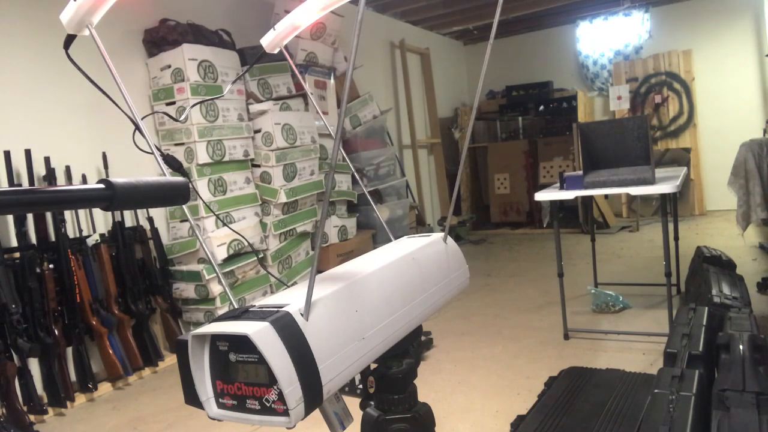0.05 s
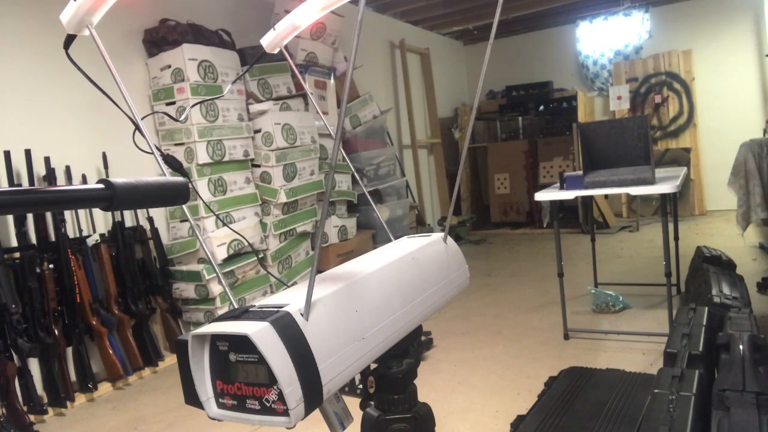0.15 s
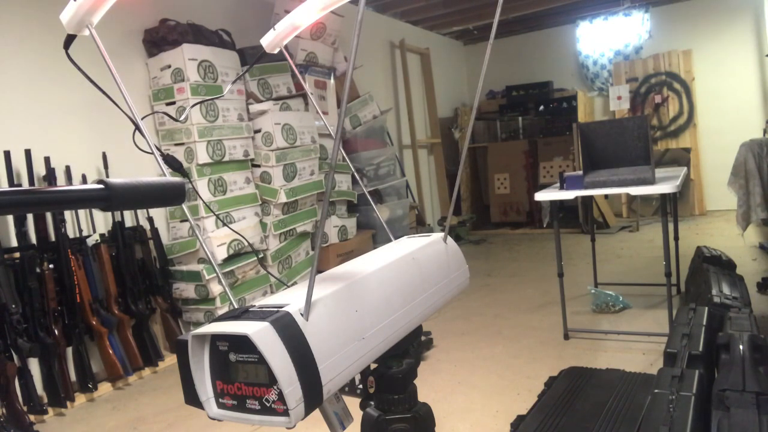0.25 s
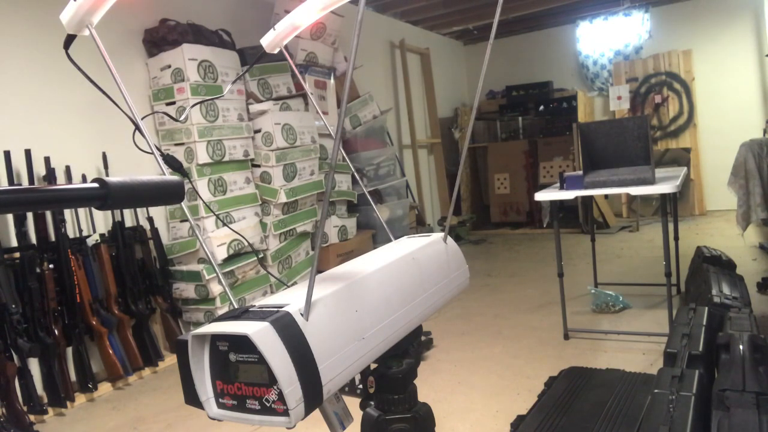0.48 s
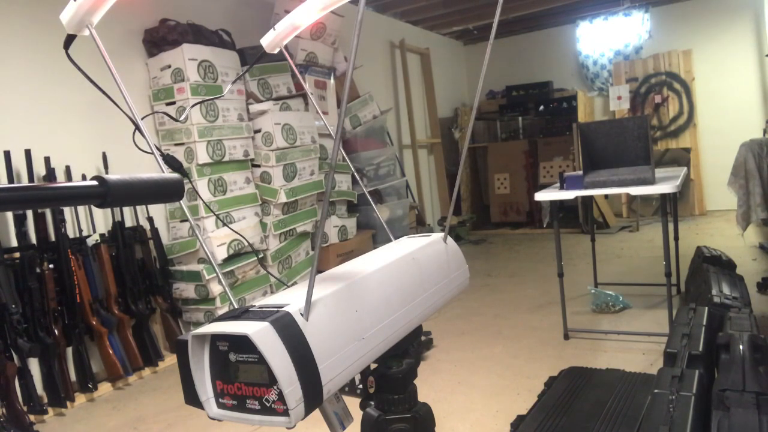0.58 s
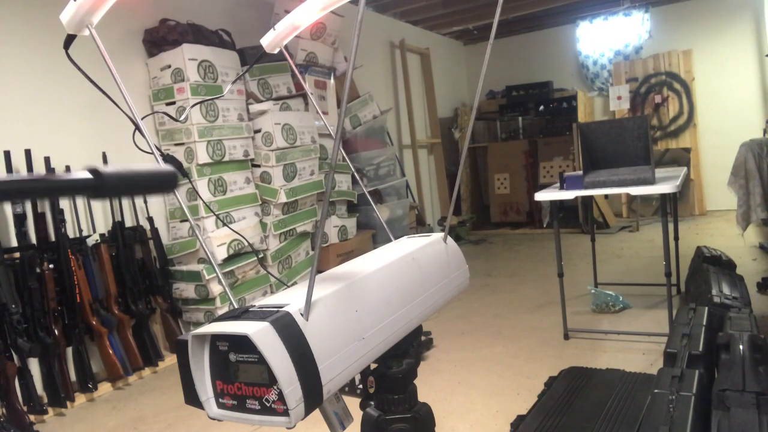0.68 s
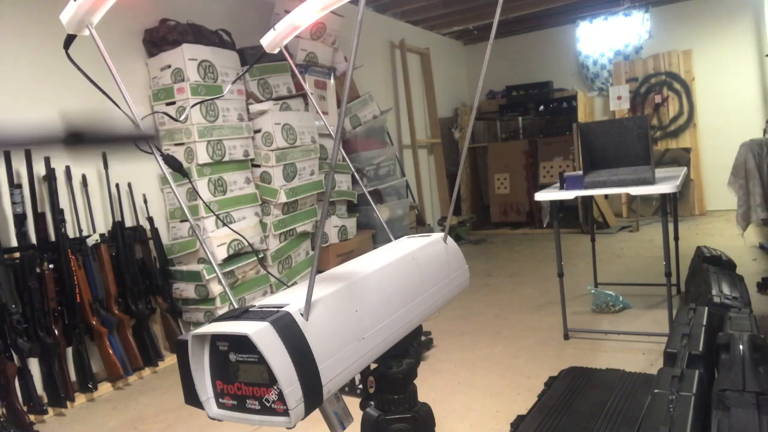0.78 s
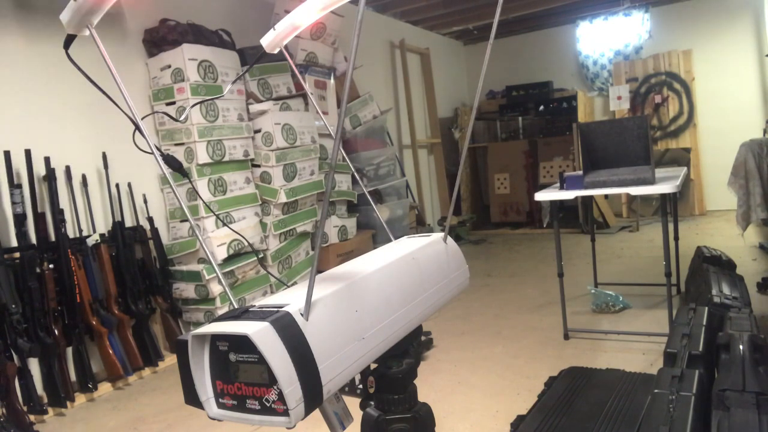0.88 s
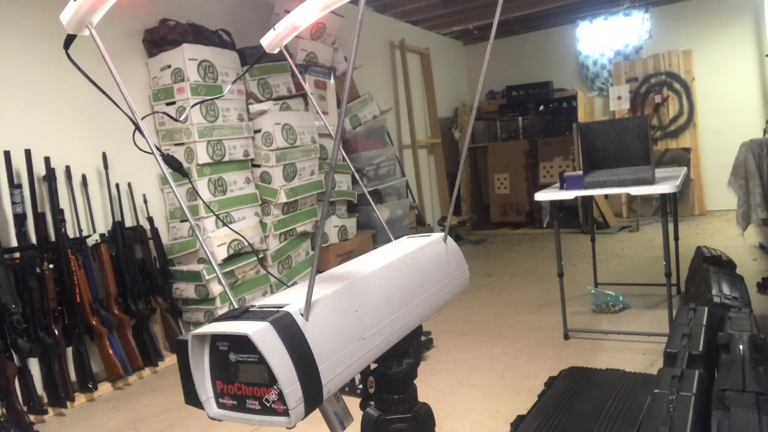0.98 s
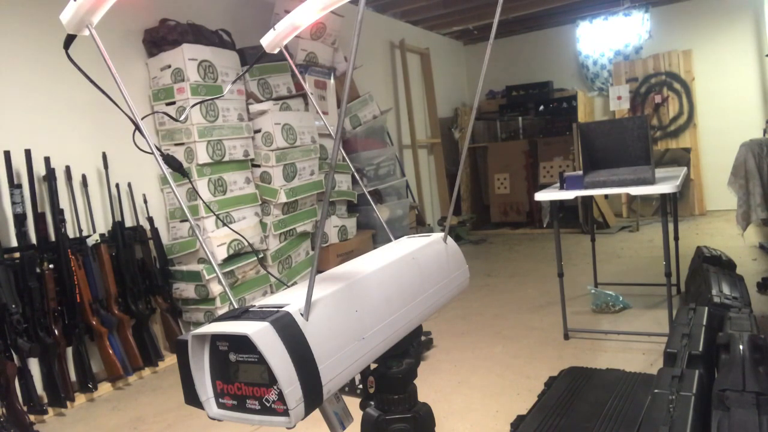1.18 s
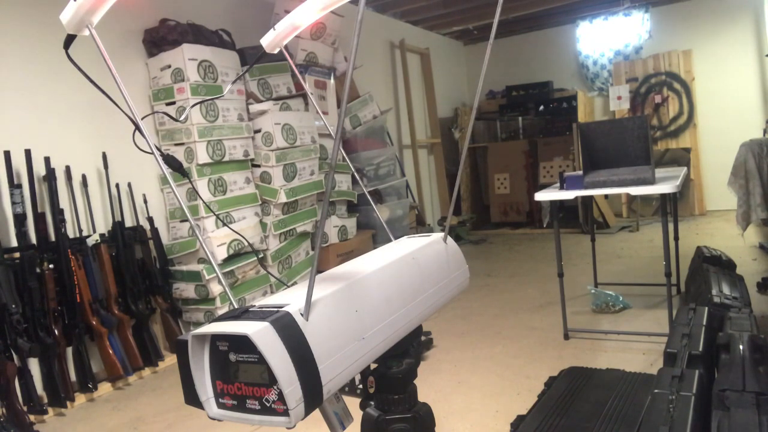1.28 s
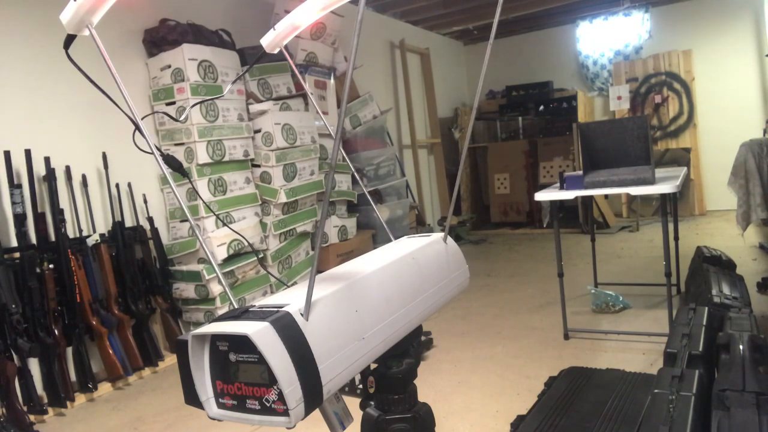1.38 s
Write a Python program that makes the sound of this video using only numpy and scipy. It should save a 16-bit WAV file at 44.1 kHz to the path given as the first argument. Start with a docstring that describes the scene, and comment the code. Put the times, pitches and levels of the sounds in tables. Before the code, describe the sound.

An air rifle fires once, close by, at about 0.2 seconds: a sharp crack with a low thump and gritty spring rattle. Almost at once the pellet smacks a steel target, whose ring fades in the basement by about 0.8 seconds. Then faint bumps and sleeve rustle follow until about 1.4 seconds, with a small tick near 1 second, over quiet hiss and rumble.

```python
"""A basement range, where a spring-piston air rifle fires once.
The sear trips, the piston rushes forward and slams home with a crack, the spring chatters and the
stock thumps. The pellet rings a steel trap. An automatic gain control ducks on the shot and swells
back under the tail; then the rifle is lifted away with small ticks, soft bumps and a rustle of
sleeves, over quiet hiss and rumble."""
import sys
import numpy as np
from scipy import signal
from scipy.fft import rfft, irfft, next_fast_len
from scipy.io import wavfile
from scipy.ndimage import uniform_filter1d, minimum_filter1d, map_coordinates

SR = 44100
rng = np.random.default_rng(int(sys.argv[2]) if len(sys.argv) > 2 else 0)


def materialize(psi):
    """Save the field psi as 16-bit PCM at rate SR to the path in sys.argv[1].

    A 1-D psi becomes a single channel; in a 2-D psi each row is a channel.
    """
    bounded = np.clip(np.atleast_2d(psi).T, -1, 1)
    quanta = np.round(bounded * 32767).astype(np.int16)
    wavfile.write(sys.argv[1], SR, quanta)


N = 63945
TIME = np.arange(N) / SR
CRACK_S, REBOUND_S, RECOIL_S, TRAP_S = 0.2009, 0.2095, 0.2085, 0.2346
CUTOFF_HZ = 15900


# The bright crack. Each row: frequency in Hz, relative level in dB.
CRACK_EQ = [(59, -44), (100, -16), (774, -19), (1760, -6), (2320, -10), (5280, -2.5), (5870, -9.5),
            (6390, -4), (12300, -15.5), (14500, -13), (15500, -17.5)]

def piston_crack():
    """The piston slams home at the end of the cylinder."""
    return blows([(CRACK_S, 3.5)], CRACK_EQ, attack=.0025, t60=.016, room_db=-6, build_s=.012)


# The chatter's tone. Each row: frequency in Hz, relative level in dB.
CHATTER_EQ = [(30, -7), (60, -7), (200, -1.5), (330, -6.5), (520, -3.5), (870, -13.5), (1300, -9),
              (2400, -4), (3500, 1.5), (5000, -9), (6850, -3.5), (10000, -14.5), (12800, -8.5),
              (15500, -15.5)]

def spring_chatter():
    """The mainspring rebounds in a gritty burst."""
    return blows([(REBOUND_S, -3)], CHATTER_EQ, attack=.00044, t60=.18, room_db=-.5, build_s=.018)


# The stock's low modes. Each row: pitch in Hz, level in dB, t60 in seconds.
THUMP_MODES = [(66, -1.5, 0.079), (156.5, -3, 0.059), (212, -3, 0.062), (363.7, -11.5, 0.092),
               (488, -7, 0.054), (609, -11, .09)]

def stock_thump():
    """Recoil shakes the stock and gives the shot its weight."""
    return ringing(THUMP_MODES, RECOIL_S, build_cycles=.42, waver=.11, waver_rate=90.54)


# Low room modes and the spring's ring. Each row: pitch in Hz, level in dB, t60 in seconds.
LINGERING_MODES = [(311, -43.5, 1.2), (380, -46, 1.2), (572, -67.5, 9), (769, -21, .74), (830, -27.5, 0.16),
                   (951, -26, .65), (1006, -25, .55), (1128.3, -21.5, 1.065)]

def lingering_ring():
    """Low room resonances and the spring's faint ring linger after the crack."""
    return ringing(LINGERING_MODES, CRACK_S, build_cycles=18, waver=.017, waver_rate=12)


# The pellet's smack. Each row: frequency in Hz, relative level in dB.
SMACK_EQ = [(180, -46), (300, -13), (417, -17), (461, -17), (756, -12.5), (892, -29), (1120, -20),
            (1220, -3), (1370, -23), (1840, -4.5), (2280, -17.5), (4210, -4.5), (4880, -16), (6790, -4),
            (7620, -9), (8280, -13.5), (15500, -18.5)]
# The trap's strong modes. Each row: pitch in Hz, relative level in dB, t60 in seconds.
TRAP_MODES = [(1241, -3, .41), (1433, -16, .52), (1522, -13, .37), (1669, -18, .53), (1850, -10, .36),
              (1891, -9, .43), (2053, -14, .47), (2169, -9, .5), (2530, -5, .49), (2614, -12, .46),
              (2822, -10, .39), (3122, -10, .34), (3191, -6, .41), (3531, -11, .47), (3654, -10, .4),
              (3754, -9, .33), (4309, -1, .41), (4643, -12, .39), (5363, -12, .38), (5413, -7, .41),
              (6088, -8, .39), (6908, -15, .42), (7004, -4, .36), (8036, -11, .35), (9644, -17, .36),
              (10508, -19, .28)]

def trap_hit():
    """The pellet smacks into steel, which rings through the room."""
    smack = blows([(TRAP_S, -5)], SMACK_EQ, attack=.00065, t60=.13, room_db=3, build_s=.021, grain_db=0)
    steel = ringing(TRAP_MODES, TRAP_S, build_cycles=12, waver=.5, waver_rate=31.8)
    return smack + from_db(-1) * steel


# The shimmer's tone. Each row: frequency in Hz, relative level in dB.
SHIMMER_EQ = [(600, -10), (1000, -9.5), (1900, 1), (3200, 3.5), (4300, -8.5), (6800, -3), (9000, 4),
              (13000, 0.5)]

def trap_shimmer(count=110, low_hz=801, high_hz=12890, scatter_db=7):
    """A crowd of weak steel modes that beat against each other as they die."""
    out, kick = np.zeros(N), np.zeros(N)
    kick[int(TRAP_S * SR)] = 1
    for k, (place, sign, size) in enumerate(rng.random((count, 3))):
        hz = low_hz + (high_hz - low_hz) * ((k + place) / count) ** 1.5
        db = -23 + at_hz(SHIMMER_EQ, hz) + scatter_db * (2 * size - 1)
        t60 = 1.027 * at_hz(ROOM_DECAY, hz)
        radius, angle = from_db(-60 / (t60 * SR)), 2 * np.pi * hz / SR
        mode = signal.lfilter([0, np.sin(angle)], [1, -2 * radius * np.cos(angle), radius ** 2], kick)
        out += np.sign(sign - .5) * from_db(db) * mode
    return out * np.clip((TIME - TRAP_S) / .02, 0, 1)


# Trigger and sear letting go. Each row: start in seconds, level in dB.
SEAR_HITS = [(0.1799, -42), (0.1859, -39)]
# Their crisp tone. Each row: frequency in Hz, relative level in dB.
SEAR_EQ = [(300, -10.5), (1500, 0), (3500, 2.5), (7500, 2), (10000, -10.5), (12500, -1), (15500, -7)]

def sear_clicks():
    """Two tiny clicks release the piston."""
    return blows(SEAR_HITS, SEAR_EQ, attack=.0004, t60=.018, room_db=-8.5, build_s=.003)


# The rush's tone. Each row: frequency in Hz, relative level in dB.
RUSH_EQ = [(60, 6), (200, 9.5), (600, -4), (1500, -0.5), (3000, 0.5), (5000, -14.5), (8200, -10),
           (10000, -22), (15000, -19)]

def piston_rush(start=.184, growth_db_per_s=797.5):
    """The piston runs up the cylinder, swelling into the crack."""
    gate = np.clip((TIME - start) / .0064, 0, 1) * np.clip((CRACK_S - TIME) / .004 + 1, 0, 1)
    swell = from_db(-36 + growth_db_per_s * np.minimum(TIME - CRACK_S, 0))
    return gate * swell * noise(RUSH_EQ)


# Ticks of the moving rifle. Each row: start in seconds, level in dB.
TICK_HITS = [(0.833, -59), (1.0451, -44)]
# Hands bumping the stock. Each row: start in seconds, level in dB.
BUMP_HITS = [(0.939, -56), (1.075, -66), (1.29, -64)]
# The sleeves' fader ride. Each row: time in seconds, level in dB.
SLEEVE_RIDE = [(0.0, -95.5), (0.81, -90.5), (0.84, -67), (0.93, -80), (1.03, -78), (1.08, -71.5),
               (1.18, -65), (1.3, -65), (1.38, -67.5), (1.45, -72)]
# Thin ticks, dull bumps, airy cloth. Each row: frequency in Hz, relative level in dB.
TICK_EQ = [(1000, -30.5), (3300, -15), (4300, 4), (5800, 0.5), (8000, 0.5), (12500, -2.5), (15500, -5)]
BUMP_EQ = [(30, -20), (85, 3), (130, 12.5), (160, -24), (230, 4.5), (400, -38), (1500, -34), (5000, -36)]
SLEEVE_EQ = [(500, -2), (1500, -9.5), (3000, 0.5), (4500, 0.5), (6500, 2), (9000, -2.5), (13000, 3.5),
             (15500, -6.5)]

def handling():
    """The rifle ticks, hands bump it and sleeves rustle as it is lifted."""
    ticks = blows(TICK_HITS, TICK_EQ, attack=.00015, t60=.0034, room_db=-18.5, build_s=.0022)
    bumps = sum(from_db(db) * envelope(s, attack=.0081, t60=.33) for s, db in BUMP_HITS) * noise(BUMP_EQ)
    sleeves = curve(SLEEVE_RIDE) * from_db(1.1 * drift(35)) * noise(SLEEVE_EQ)
    return ticks + bumps + sleeves


# The rumble's fader ride. Each row: time in seconds, level in dB.
RUMBLE_RIDE = [(0, -62.5), (0.1, -77.5), (0.6, -65.5), (0.9, -68), (1.02, -75.5), (1.15, -66),
               (1.45, -68.5)]
# The tone of rumble and hiss. Each row: frequency in Hz, relative level in dB.
RUMBLE_EQ = [(30, -15), (70, -5.5), (105, 5), (160, -12), (225, 0.5), (330, -8), (600, -13.5), (1200, -28),
             (4000, -52)]
HISS_EQ = [(30, -9), (70, -2.5), (130, -7), (300, -8.5), (600, -13), (1300, -15), (2500, -20),
           (6000, -23.5), (9000, -26.5), (13000, -26), (15500, -29)]

def room_tone():
    """A bed of quiet hiss and uneven low rumble."""
    return from_db(-67.5) * noise(HISS_EQ) + curve(RUMBLE_RIDE) * noise(RUMBLE_EQ)


# The basement's reverb. Each row: frequency in Hz, t60 in seconds.
ROOM_DECAY = [(60, .24), (150, 0.41), (400, .44), (1000, .46), (2500, 0.45), (5000, 0.44), (8000, 0.35),
              (12000, .275), (14000, 0.48), (15500, .2)]

def blows(hits, eq, attack, t60, room_db, build_s, grain_db=4):
    """Each hit (start in seconds, level in dB) is a noise burst with a room tail dying band by band."""
    edges = np.r_[np.geomspace(40, 9000, 22), 11000, 13000, 14500, 16000]
    centres = np.sqrt(edges[1:] * edges[:-1])
    gains = from_db(at_hz(eq, centres)) * np.sqrt(np.diff(edges))
    grain = from_db(grain_db * drift(600))
    direct_power = sum((from_db(db) * envelope(s, attack, t60) * grain) ** 2 for s, db in hits)
    out = np.zeros(N)
    for band, hz, gain in zip(zip(edges, edges[1:]), centres, gains / np.linalg.norm(gains)):
        room_t60 = at_hz(ROOM_DECAY, hz)
        tail_power = sum((from_db(db + room_db) * envelope(s, build_s, room_t60)) ** 2 for s, db in hits)
        bandpass = signal.butter(3, band, "band", fs=SR, output="sos")
        band_noise = rms_one(signal.sosfilt(bandpass, rng.standard_normal(N)))
        out += gain * np.sqrt(direct_power + tail_power) * band_noise
    return out


def ringing(modes, start, build_cycles, waver, waver_rate):
    """Struck modes swell and die; reflections make them waver."""
    out = np.zeros(N)
    for hz, db, t60 in modes:
        wander = drift(waver_rate) + 1j * drift(waver_rate)
        reflections = (1 + waver * wander) / np.sqrt(1 + 2 * waver ** 2)
        tone = np.imag(reflections * np.exp(2j * np.pi * hz * (TIME - start)))
        out += from_db(db) * envelope(start, build_cycles / hz, t60) * tone
    return out


def noise(eq):
    """Steady coloured noise of rms 1."""
    size = next_fast_len(N)
    hz = np.maximum(np.fft.rfftfreq(size, 1 / SR), 1)
    spectrum = rfft(rng.standard_normal(size)) * from_db(at_hz(eq, hz)) * (hz < CUTOFF_HZ)
    return rms_one(irfft(spectrum, size)[:N])


def envelope(start, attack, t60):
    """A straight rise on an exponential fall of 60 dB in t60 seconds."""
    age = np.maximum(TIME - start, 0)
    return np.minimum(age / attack, 1) * from_db(-60 * age / t60)


def drift(rate):
    """Smooth motion through `rate` random values a second, spread about 1."""
    coarse = TIME[::16]
    knots = rng.standard_normal(2048)
    return np.interp(TIME, coarse, map_coordinates(knots, [coarse * rate], order=3, mode="wrap"))


def curve(ride):
    """A fader ride as gain per sample."""
    return from_db(np.interp(TIME, *np.transpose(ride)))


def at_hz(points, hz):
    """Read a table on a log-frequency axis."""
    freqs, values = np.transpose(points)
    return np.interp(np.log(hz), np.log(freqs), values)


def from_db(db):
    """Decibels to gain."""
    return 10 ** (np.asarray(db) / 20)


def rms_one(x):
    """Scale to unit rms."""
    return x / np.sqrt(np.mean(np.abs(x) ** 2) + 1e-20)


def scene():
    """Rifle, trap, handling and room tone, mixed to mono."""
    release = sear_clicks() + piston_rush()
    shot = piston_crack() + spring_chatter() + stock_thump() + lingering_ring()
    return (release + shot + trap_hit() + trap_shimmer() + handling() + room_tone())[None]


def gain_control(x, limit_db=-8.5, sense_s=.005, hold_s=.16, release_db_per_s=76.5):
    """Gain ducks at once on loud sound, holds, then climbs back steadily."""
    power = uniform_filter1d(x ** 2, int(sense_s * SR))
    excess_db = np.maximum(10 * np.log10(np.abs(power) + 1e-12) - limit_db, 0)
    half = int(hold_s * SR / 2)
    held_db = -minimum_filter1d(-excess_db, 2 * half + 1, origin=half, mode="constant")
    release_db = release_db_per_s * TIME
    return x * from_db(release_db - np.maximum.accumulate(held_db + release_db))


def record(dry):
    """Gain control, soft-clipped peaks and a steep top cut."""
    ceiling = 1.1
    rounded = ceiling * np.tanh(gain_control(dry[0]) / ceiling)
    top_cut = signal.ellip(10, .2, 80, CUTOFF_HZ, fs=SR, output="sos")
    return signal.sosfilt(top_cut, rounded)[None]


dry = scene()
out = record(dry)
materialize(out)
```